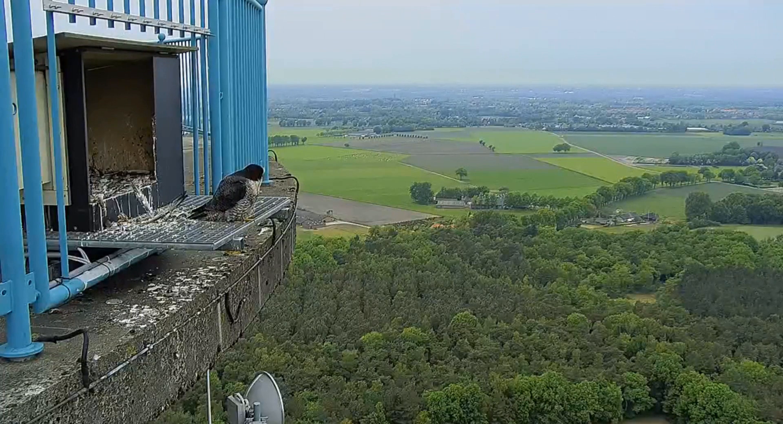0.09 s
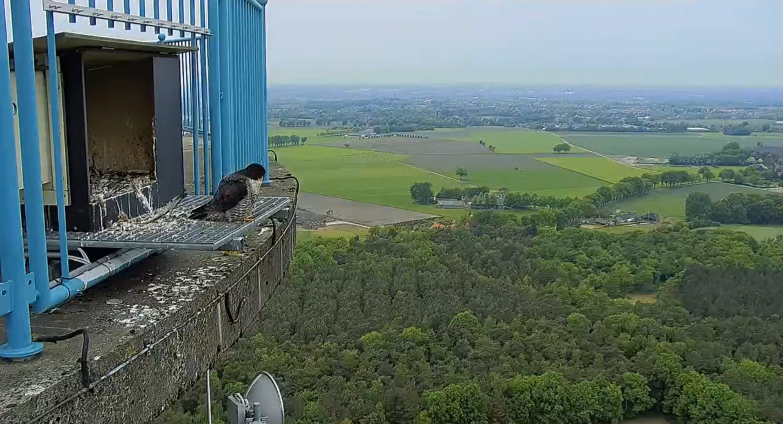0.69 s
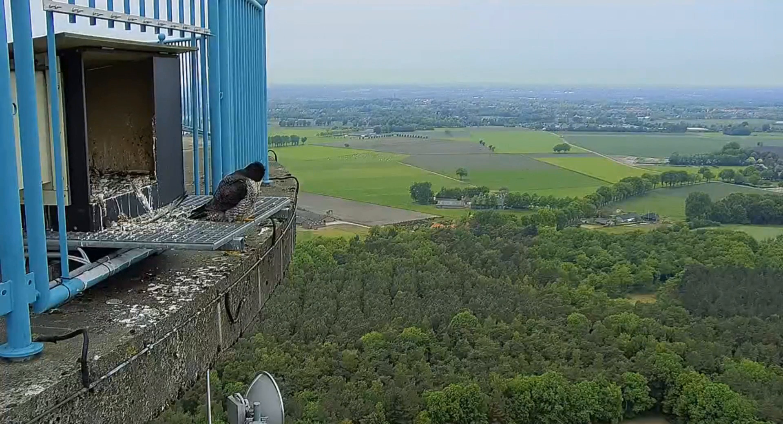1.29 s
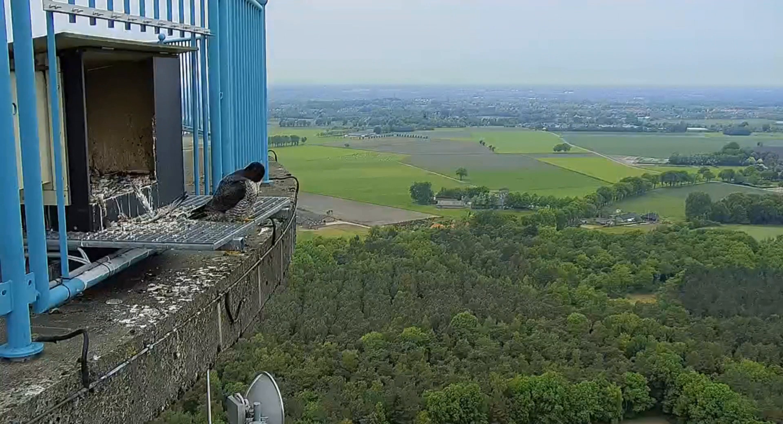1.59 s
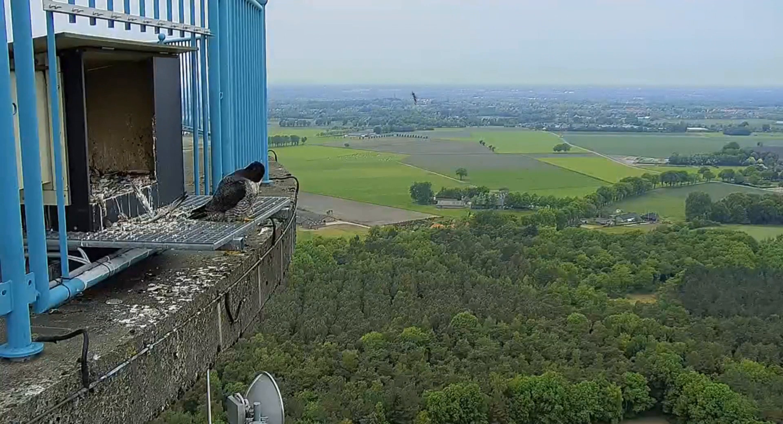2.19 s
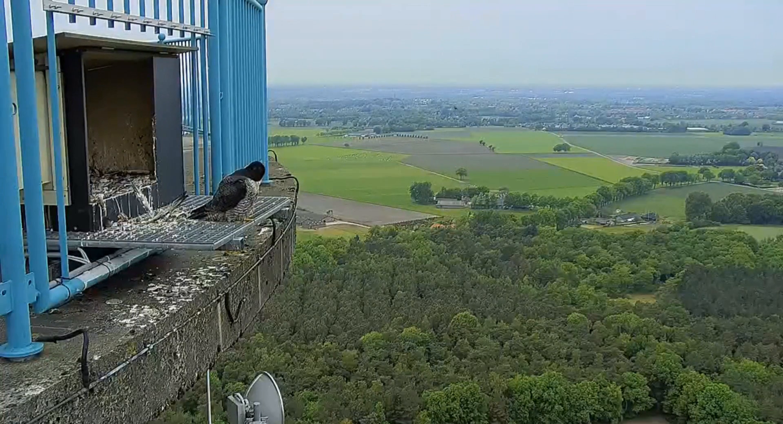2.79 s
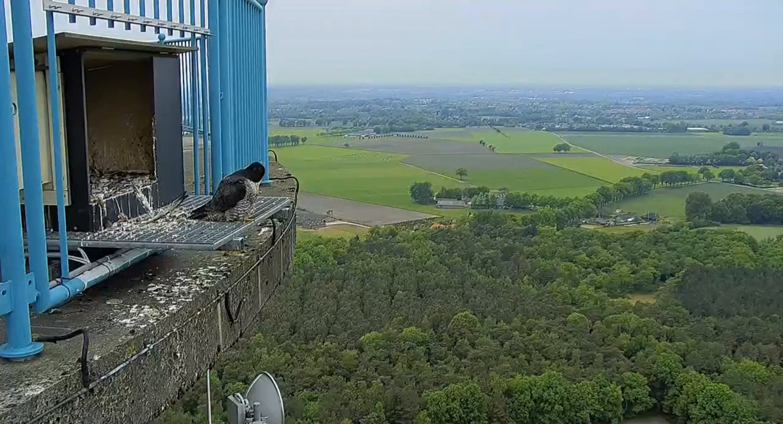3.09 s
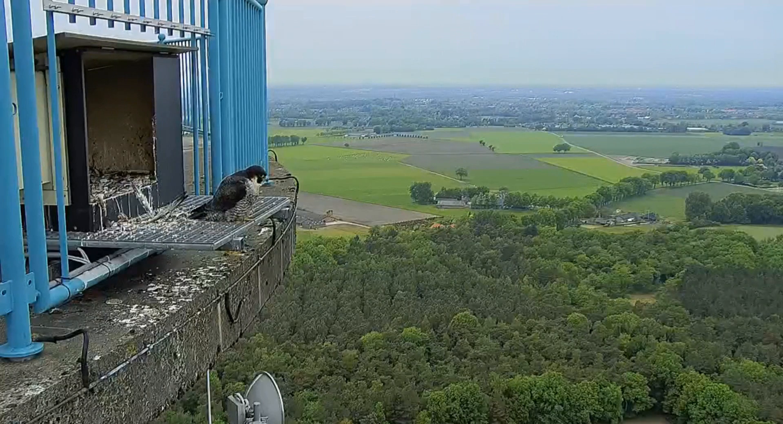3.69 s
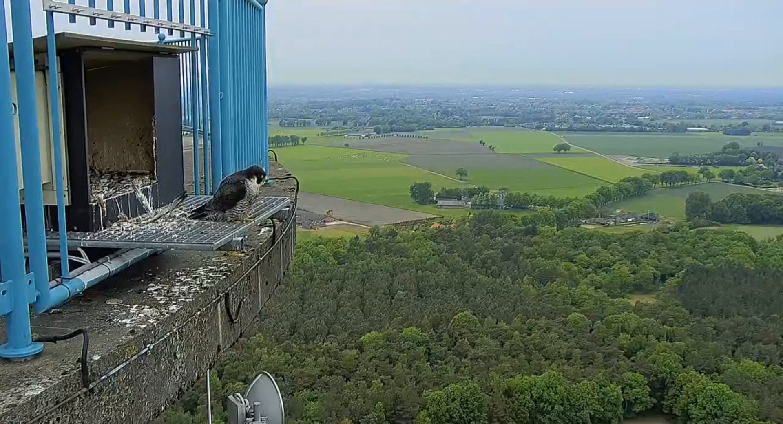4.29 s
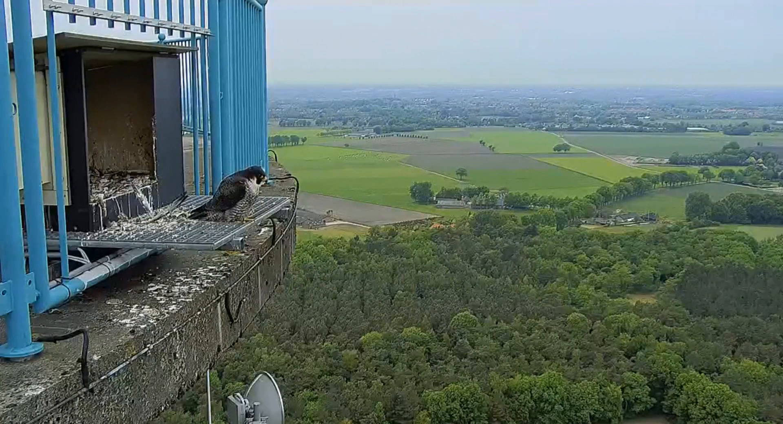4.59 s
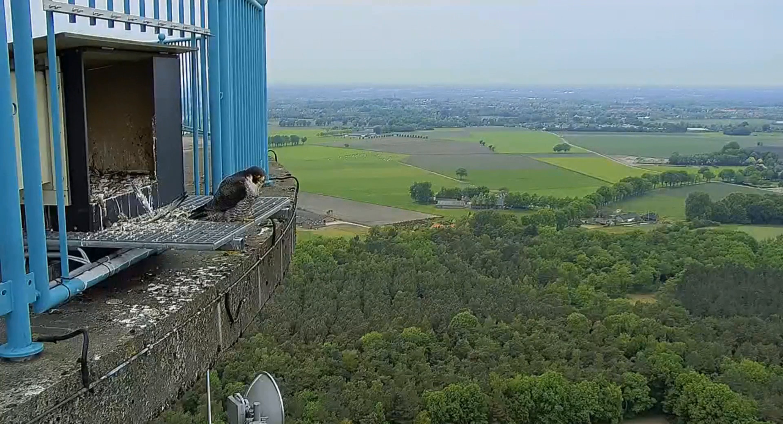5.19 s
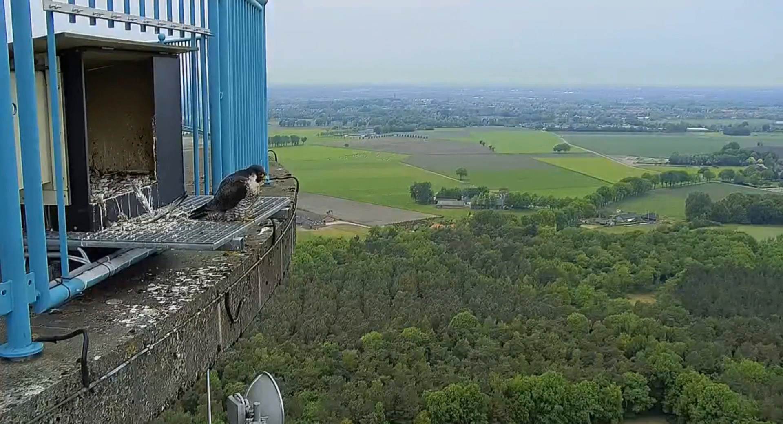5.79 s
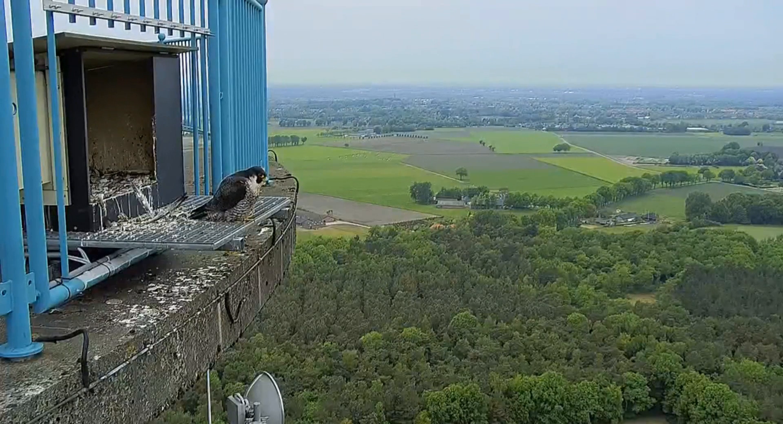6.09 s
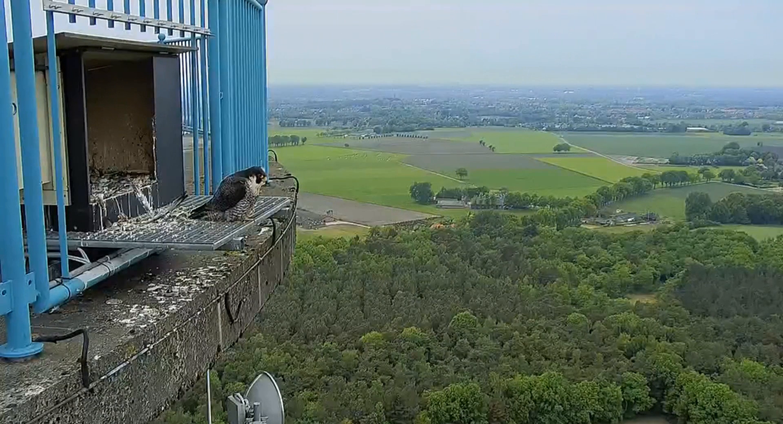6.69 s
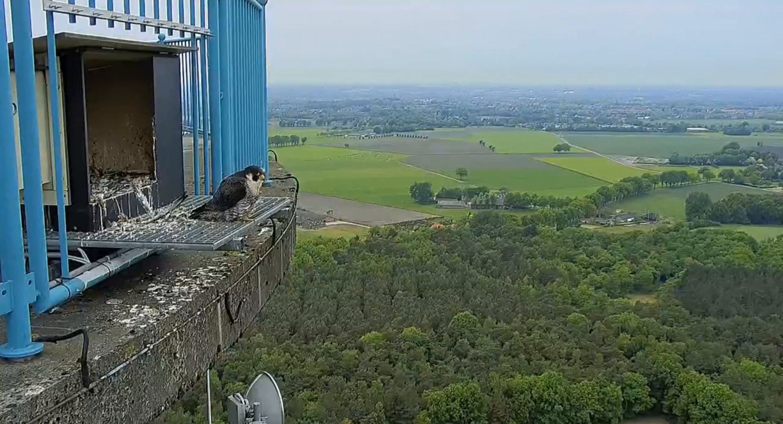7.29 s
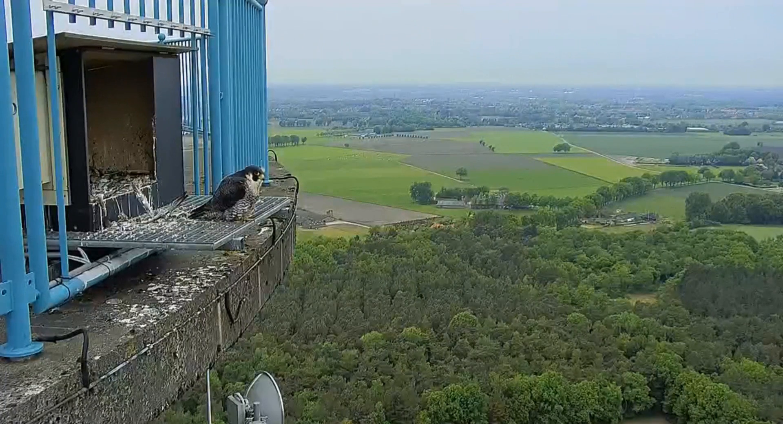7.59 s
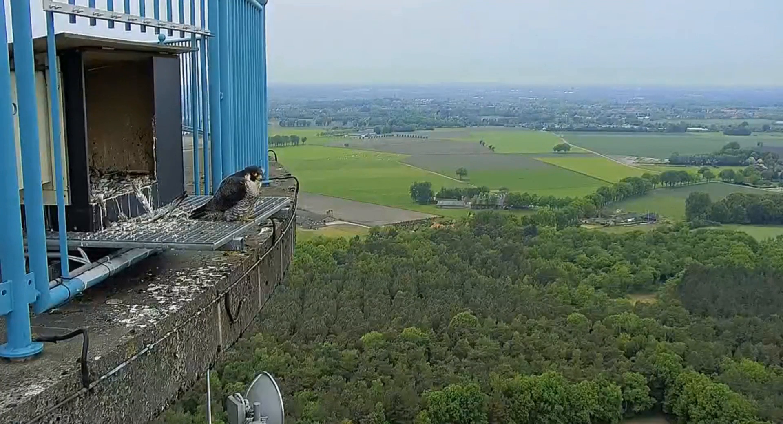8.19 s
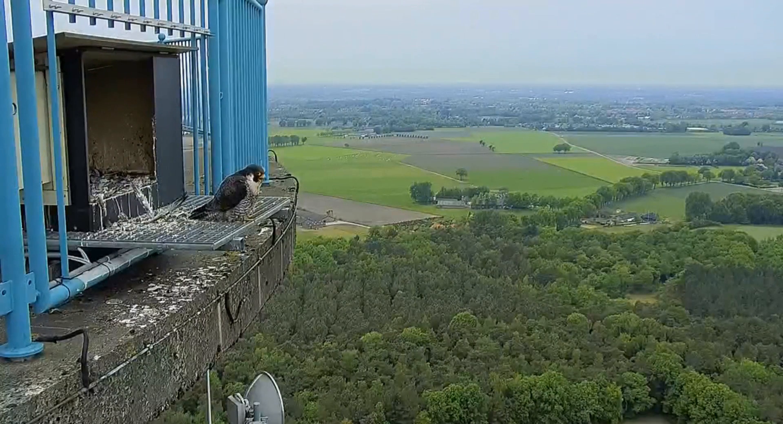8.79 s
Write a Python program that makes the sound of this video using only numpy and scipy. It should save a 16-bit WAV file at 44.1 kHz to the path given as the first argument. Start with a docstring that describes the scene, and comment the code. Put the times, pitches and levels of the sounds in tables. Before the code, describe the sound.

A falcon gives short, sharp two-part calls at irregular intervals over a low wind rumble and faint hum.

```python
"""A falcon high on a tower calls "ee-chup": a thin whistle, a sharp chip, then a break to a low chup.
Soft clucks and peeps fall between the calls, and faint wails come from afar.
The nest box and wall give a short echo. Wind rumbles on the nest camera's microphone,
rushes round the tower and hums in the steel railing.
The microphone feeds the right channel; only a little leaks into the left, and both hiss."""
import sys
import numpy as np
from scipy import signal
from scipy.fft import rfft, irfft, next_fast_len
from scipy.io import wavfile
from scipy.ndimage import map_coordinates

SR = 44100
rng = np.random.default_rng(int(sys.argv[2]) if len(sys.argv) > 2 else 0)


def persist_wave(psi):
    """Save psi, clipped to +-1, as 16-bit WAV."""
    counts = np.round(np.clip(psi, -1, 1) * 32767).astype(np.int16)
    wavfile.write(sys.argv[1], SR, np.atleast_2d(counts).T)


N = 397782


def amp(db):
    """Turn decibels into a gain."""
    return 10 ** (np.asarray(db) / 20)


def unit(x):
    """Scale a sound to an average (rms) level of 1."""
    return x / np.sqrt(np.mean(x ** 2) + 1e-20)


def along(points, hz):
    """Read (frequency, value) points at hz, on a log frequency axis."""
    f, v = np.transpose(points)
    return np.interp(np.log(hz + 1), np.log(f + 1), v)


def curves(rows, t):
    """Read each column after the time column at times t."""
    times, *columns = np.transpose(rows)
    return [np.interp(t, times, column) for column in columns]


def wobble(rate, t):
    """A smooth random curve through rate points a second."""
    knots = (t - t[0]) * rate
    return map_coordinates(rng.standard_normal(int(knots[-1]) + 4), [knots])


def filtered(x, response):
    """Scale each frequency in x by the gain response(hz)."""
    size = x.shape[-1]
    padded = next_fast_len(size + 8192)
    return irfft(rfft(x, padded) * response(np.fft.rfftfreq(padded, 1 / SR)), padded)[..., :size]


def noise(spectrum, size):
    """Noise of rms 1, shaped by (f/Hz, level/dB) points."""
    return unit(filtered(rng.standard_normal(size), lambda hz: amp(along(spectrum, hz))))


def gate(t, length, rise, fall):
    """Fade a note in from time 0 and out around length."""
    return np.clip(t / rise, 0, 1) * (1 - np.tanh((t - length) / fall)) / 2


def cycles(hz):
    """The running phase of a moving pitch, in radians."""
    return 2 * np.pi * np.cumsum(hz) / SR


def add(track, start, sound):
    """Mix a sound into the track at start seconds."""
    part = track[max(round(start * SR), 0):][:len(sound)]
    part += sound[:len(part)]


def swell(length, depth_db):
    """Times, progress (0 to 1) and gain for a note that is loudest in its middle."""
    t = np.arange(int((length + .02) * SR)) / SR
    progress = np.minimum(t / length, 1)
    gain = amp(-depth_db * (2 * progress - 1) ** 2) * gate(t, length, rise=0.0015, fall=.004)
    return t, progress, gain


def thin_tone(hz, db, t, waver):
    """A nearly pure tone that quivers slightly in pitch and level."""
    phase = cycles(hz * (1 + waver * wobble(148.4, t)))
    return amp(db + wobble(60.4, t)) * (np.sin(phase) + amp(-39) * np.sin(2 * phase))


def echoed(sound, echo_db):
    """Add the short, blurred echo of the nest box and wall."""
    # how long the echo lasts: f/Hz, time to fade by 60 dB/s
    fade_times = [(300, 0.079), (1200, 0.13), (2700, 0.15), (6000, 0.098)]
    hz, t, spectrum = signal.stft(rng.standard_normal(SR // 4), SR, nperseg=256)
    fade = amp(-60 * t / along(fade_times, hz)[:, None])
    tail = signal.istft(spectrum * fade * np.clip(t / 0.033, 0, 1), SR, nperseg=256)[1]
    response = amp(echo_db) * tail / np.linalg.norm(tail)
    response[0] += 1  # the direct sound
    return signal.fftconvolve(sound, response)


def slides(rows, waver, wander_oct, echo_db):
    """Thin notes whose pitch slides along a shallow arch."""
    track = np.zeros(N)
    for start, length, hz, slide, db in rows:
        t, progress, gain = swell(length, depth_db=7)
        arch = -.045 * (2 * progress - 1) ** 2
        pitch = hz * 2 ** (slide * (progress - .5) + arch + wander_oct * wobble(18, t))
        add(track, start, echoed(gain * thin_tone(pitch, db, t, waver), echo_db))
    return track


def humming_bar(centre, width):
    """One railing bar hums in the wind: a narrow band of noise around its note."""
    return unit(filtered(rng.standard_normal(N), lambda hz: 1 / (1 + ((hz - centre) / width) ** 2)))


def wind():
    """Gusts shake the microphone; the breeze rushes round the tower and sets the railing humming."""
    # gusts on the microphone: t/s, relative level/dB
    gusts = [(0.0, -38), (0.1, -34.5), (0.8, -41.5), (0.85, -36.5), (1.7, -30.5), (2.36, -47), (2.91, -30),
             (4.01, -36), (4.16, -50.5), (4.91, -42.5), (5.06, -25.5), (5.46, -30.5), (5.86, -39),
             (6.71, -46), (7.52, -36), (7.72, -41.5), (8.72, -41.5), (9.02, -40)]
    # slow drift of the wind: t/s, flutter level/dB, rush level/dB, hum level/dB
    drift = [(0, -37, -41.5, -42.5), (1.4, -35, -44.5, -47), (2.2, -37.5, -42, -42),
             (3.0, -36.5, -43.5, -45.5), (3.8, -35.5, -42, -42.5), (5.3, -38.5, -44, -43.5),
             (6.4, -38, -43, -45), (7.3, -39.5, -42.5, -46), (8.4, -44.5, -47, -46.5),
             (9.02, -39, -45.5, -45.5)]
    # deep rumble and higher flutter on the microphone, rush round the tower: f/Hz, level/dB
    rumble_shape = [(8, -8.5), (16, 3.5), (28, 3), (45, -4), (62, -14.5), (90, -58), (200, -75)]
    flutter_shape = [(30, -7.5), (55, -3), (70, 2), (88, -2.5), (110, -11.5), (150, -21.5), (220, -26.5),
                     (450, -81)]
    rush_shape = [(80, -15), (170, -5.5), (300, -2.5), (420, 0.5), (580, -2), (660, -4.5), (830, -5.5),
                  (950, -8), (1250, -16), (1600, -23), (2000, -37), (2800, -43.5), (5000, -51)]
    # railing bars: f/Hz, width/Hz, level/dB
    bars = [(355.5, 13.9, 2.5), (523.2, 26, -3), (776, 40, -9.5), (237.3, 20, -15.5)]
    t = np.arange(N) / SR
    gust_db, = curves(gusts, t)
    flutter_db, rush_db, hum_db = curves(drift, t)
    flutter_db += 0.24 * (gust_db - gust_db.mean())  # flutter grows with the gusts
    rumble = amp(gust_db + 5.5 + 1.3 * wobble(8, t)) * noise(rumble_shape, N)
    flutter = amp(flutter_db + 1.14 * wobble(9, t)) * noise(flutter_shape, N)
    rush = amp(rush_db + 1.57 * wobble(7, t)) * noise(rush_shape, N)
    hum = sum(amp(db) * humming_bar(hz, width) for hz, width, db in bars)
    return rumble + flutter + rush + amp(hum_db) * hum


def far_wails():
    """Faint wails from afar, with plenty of echo; most of them fall in pitch."""
    # wails: t/s, length/s, f/Hz, slide/octaves, level/dB
    notes = [(3.4, 0.22, 2040, -.04, -72.5), (3.66, 0.16, 2050, -0.15, -63), (3.8, .15, 2370, -.09, -71),
             (4.2, 0.32, 2120, 0, -69), (4.4, 0.38, 1998, -0.054, -68), (4.68, 0.29, 2060, -.13, -73),
             (5.0, 0.65, 3930, 0.0053, -76), (6.06, .145, 2025, -.06, -65), (6.19, 0.05, 2330, -0.17, -67),
             (6.6, .32, 2080, -0.044, -69), (7.03, .06, 2320, -.14, -70), (7.14, 0.52, 1970, 0.019, -61.5),
             (7.6, 0.34, 2080, -0.046, -66.5), (8.2, 0.25, 2110, -0.011, -67),
             (8.46, .17, 2480, -0.15, -68.5)]
    return slides(notes, waver=0.012, wander_oct=0.0121, echo_db=-3.0)


def peeps():
    """The falcon's small squeaks and peeps."""
    # peeps: t/s, length/s, f/Hz, slide/octaves, level/dB
    notes = [(.715, 0.023, 4570, .09, -62), (1.455, .07, 4590, 0.057, -59.5),
             (2.09, 0.036, 1230, -0.13, -33), (2.203, .016, 4760, -0.061, -58),
             (3.0, .026, 4700, 0.044, -64)]
    return slides(notes, waver=.008, wander_oct=.003, echo_db=-16)


def chup(length, hz, db, rasp_db, fall_oct):
    """A falling note in the bird's low voice, with a rasp that pulses once a cycle."""
    # the tone's harmonics: multiple of the pitch, level/dB
    harmonics = [(1, -2.5), (2, -19.5), (3, -23.5), (4, -29)]
    # raspy noise in the voice: f/Hz, level/dB
    rasp_shape = [(300, 5.5), (600, 14), (1300, 6), (2400, -13), (3100, -18), (4100, -12), (5000, -56)]
    t = np.arange(SR // 12) / SR
    slide = -fall_oct * (np.minimum(t / length, 1.5) - .5) + 0.26 * np.exp(-t / 0.0011)
    phase = cycles(hz * 2 ** (slide + .03 * wobble(500, t)))
    tone = amp(db) * sum(amp(level) * np.sin(k * phase) for k, level in harmonics)
    tone *= gate(t, length * .92, rise=.0025, fall=.0045)
    rasp = amp(rasp_db) * noise(rasp_shape, len(t)) * (1 + 0.18 * np.cos(phase))
    rasp *= gate(t, length, rise=.002, fall=.8 * length)  # a longer note leaves a longer rasp
    return echoed(tone + rasp, echo_db=-11.5)


def clucks():
    """Soft clucks between the calls: duller chups that hardly slide."""
    # clucks: t/s, length/s, f/Hz, tone level/dB, rasp level/dB
    notes = [(2.076, 0.009, 499, -18, -34), (2.883, 0.019, 515, -28.5, -36.5), (4.373, .009, 505, -30, -36),
             (6.222, 0.013, 614, -49, -41.5), (7.189, 0.015, 484, -33, -44),
             (8.116, .013, 488, -28.5, -44.5), (8.607, 0.027, 501, -37, -50)]
    cut_treble = signal.butter(6, 2800, fs=SR, output="sos")
    track = np.zeros(N)
    for start, length, hz, db, rasp_db in notes:
        add(track, start, signal.sosfilt(cut_treble, chup(length, hz, db, rasp_db, fall_oct=0.024)))
    return track


def whistles():
    """A thin whistle announces a call: it scoops up, sinks, and lifts a little at the end."""
    # whistles: t/s, length/s, f/Hz at the dip, arch above f/share, scoop below f/share, level/dB
    notes = [(2.138, .066, 2845, 0.045, 0.035, -44), (2.898, 0.099, 2940, 0.17, 0.104, -45.5),
             (4.388, .125, 2845, 0.17, 0.15, -47), (5.225, 0.076, 2897, 0.072, 0.3, -41.5),
             (7.22, 0.12, 2790, 0.087, 0, -47), (8.169, 0.057, 2930, 0.022, 0.0032, -47)]
    dip_share, scoop_s = 0.69, 0.0086  # the dip comes this far through the note
    throat_hz, loss_db_per_oct = 2850, 50  # a whistle weakens away from the throat's own note
    track = np.zeros(N)
    for start, length, hz, arch, scoop, db in notes:
        t, progress, gain = swell(length, depth_db=4.5)
        pitch = hz * (1 + arch * (1 - progress / dip_share) ** 2 - scoop * np.exp(-t / scoop_s))
        loss_db = loss_db_per_oct * np.abs(np.log2(pitch / throat_hz))
        level_db = db + 1.0 - loss_db + 1.6 * wobble(107, t)
        add(track, start, echoed(gain * thin_tone(pitch, level_db, t, waver=0.0092), echo_db=-18.5))
    return track


def chip(length, hz, bend, db, first_db, third_db, release, t):
    """The voice snaps on above its pitch, settles and sags; the throat favours the second harmonic."""
    # a faint high rasp around the chip: f/Hz, level/dB
    rasp_shape = [(3000, -12), (3700, 1), (4200, 5), (4600, -7), (5500, -40)]
    settle_s, sag_oct_per_s = 0.405 * length + 0.0015, 1.85
    opening = 1 - np.tanh(np.maximum(t, -.002) / settle_s)
    phase = cycles(hz * 2 ** (-sag_oct_per_s * t) * (1 + bend * opening + 0.017 * wobble(676, t)))
    # the odd harmonics are hoarse, and the third is strongest while the beak opens
    hoarse = phase + .3 * wobble(533, t)
    third = amp(third_db + 16.7 * opening - 9.5) * np.sin(2 * phase + hoarse)
    tone = amp(first_db) * np.sin(hoarse) + np.sin(2 * phase) + third + amp(-31) * np.sin(4 * phase)
    tone *= gate(t, length + 0.3 * release, rise=0.36 * length, fall=release)
    tone *= 1 + 0.5 * np.clip(t / length - .7, 0, 1) * wobble(590, t)  # scratchy as the voice breaks
    rasp = amp(third_db - 13.5) * noise(rasp_shape, len(t))
    rasp *= gate(t - t[0], length - t[0], rise=.007, fall=.015)
    return echoed(amp(db + 1.44 * wobble(407, t)) * (tone + rasp), echo_db=-20)


def calls():
    """The falcon's "ee-chup": each high chip breaks into a low chup."""
    # calls: t/s; chip length/s, f/Hz, opening bend/share, second harmonic level/dB,
    # first and third harmonic relative levels/dB; chup length/s, f/Hz, level/dB, rasp level/dB
    ee_chups = [(0.072, .029, 1287, 0.14, -32, -3, -9, 0.016, 590, -36, -32),
                (0.821, 0.0086, 1296, .09, -36.5, -11, -19, 0.023, 537, -16.5, -36.5),
                (1.508, .008, 1090, 0.16, -34.5, -11, -19, 0.011, 615, -28, -39.5),
                (2.342, 0.02, 1362, 0.024, -30, -16, -15.5, .023, 579, -20, -32.5),
                (3.137, 0.026, 1327, 0.06, -35, -11, -7, .017, 639, -27.5, -32),
                (3.741, 0.021, 1248, 0.086, -33.5, -16, -19, 0.021, 558, -22, -52),
                (4.642, 0.027, 1333, 0.087, -33, -13, -15.5, 0.017, 588, -21.5, -33.5),
                (5.343, .015, 1235, 0.065, -40.5, -9, -14, 0.023, 569, -19, -42),
                (6.449, .016, 1208, 0.17, -39.5, -1, -15, 0.019, 548, -26.5, -37.5),
                (7.473, .023, 1280, 0.138, -33, -5, -19.5, 0.0175, 642, -34.5, -40),
                (8.350, 0.021, 1333, 0.095, -34, -0.5, -13, 0.029, 572, -24, -42)]
    lead_s = .008  # a faint high rasp fades in just before each chip
    t = np.arange(SR // 10) / SR - lead_s
    track = np.zeros(N)
    for start, length, hz, bend, db, first_db, third_db, chup_s, chup_hz, chup_db, rasp_db in ee_chups:
        release = .003 * 2 ** ((-17.5 - chup_db) / 6)  # the weaker the chup, the longer the chip lingers
        add(track, start - lead_s, chip(length, hz, bend, db, first_db, third_db, release, t))
        add(track, start + length, chup(chup_s, chup_hz, chup_db, rasp_db, fall_oct=0.437))
    return track


def scene():
    """Everything reaches one microphone on the right channel; a little bass leaks to the left."""
    # leak from right to left: f/Hz, level/dB
    leak = [(20, -29), (60, -30), (150, -42), (350, -58), (1000, -54)]
    falcon = calls() + clucks() + whistles() + peeps()
    microphone = falcon + far_wails() + wind()
    left = filtered(microphone, lambda hz: amp(along(leak, hz)))
    return np.array([left, microphone])


def record(dry):
    """Each channel adds its own amplifier hiss, and the highest treble is cut off."""
    # amplifier hiss: f/Hz, level/dB
    hiss_shape = [(20, 20.5), (100, 17), (300, 10), (700, 4), (1500, 3.5), (5000, 3), (15000, 1.5)]
    hiss = amp(-63.5) * np.array([noise(hiss_shape, N), noise(hiss_shape, N)])
    return filtered(dry + hiss, lambda hz: hz < 15150)


dry = scene()
out = record(dry)
persist_wave(out)
```